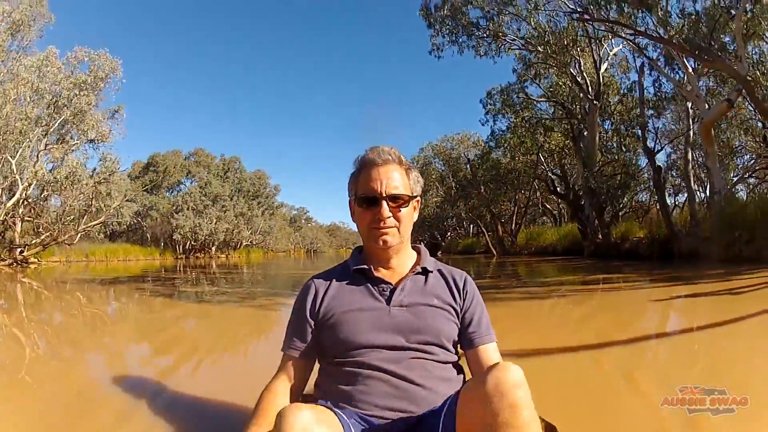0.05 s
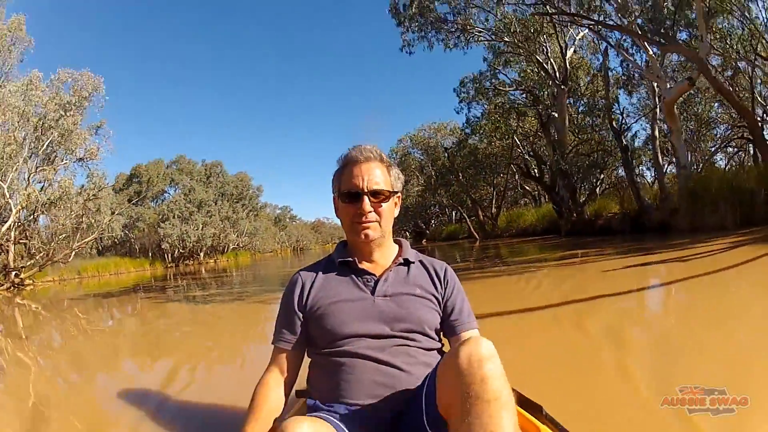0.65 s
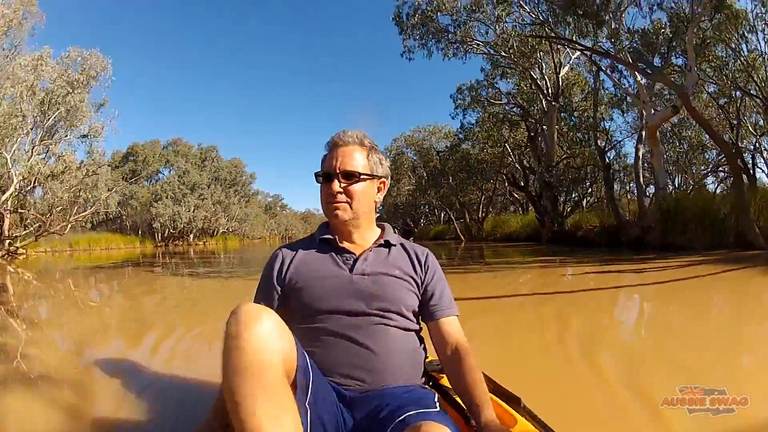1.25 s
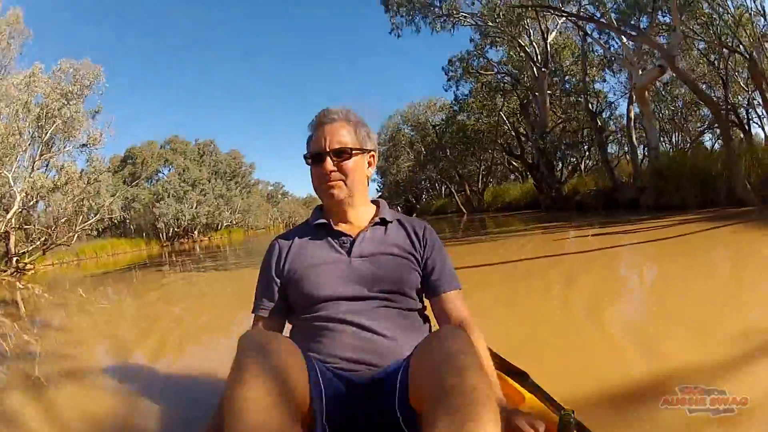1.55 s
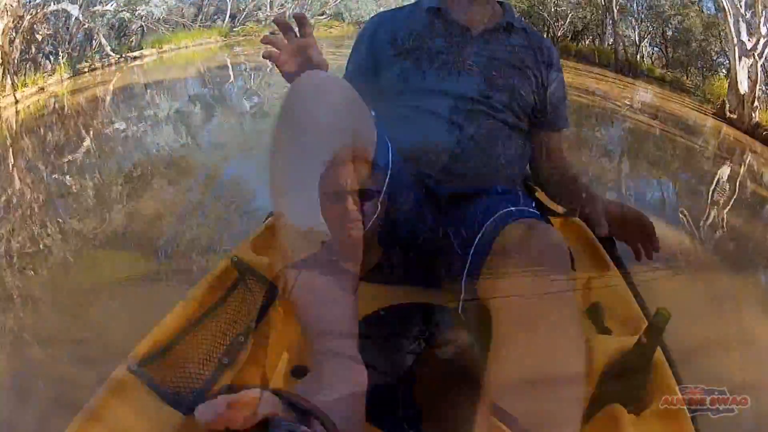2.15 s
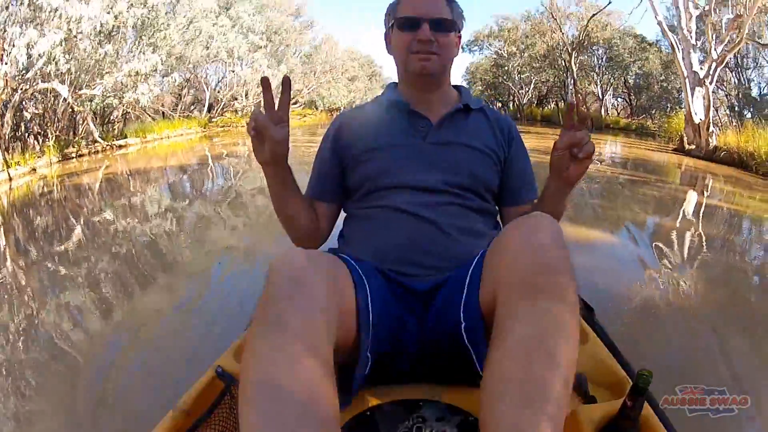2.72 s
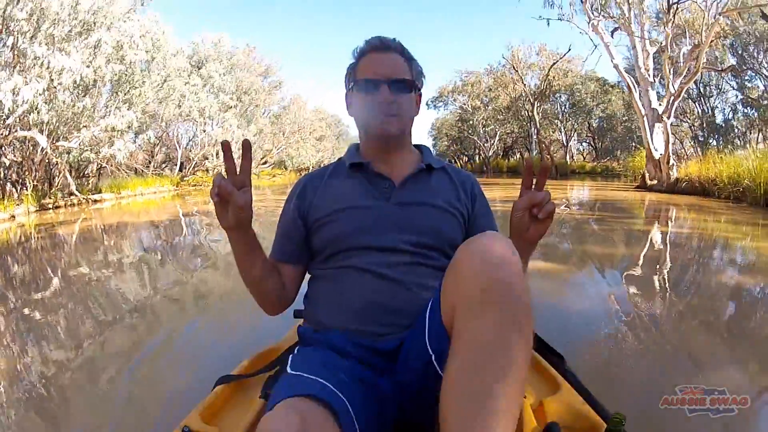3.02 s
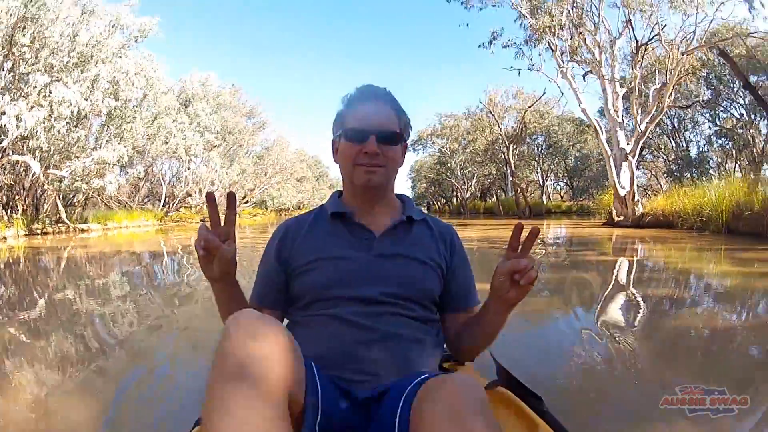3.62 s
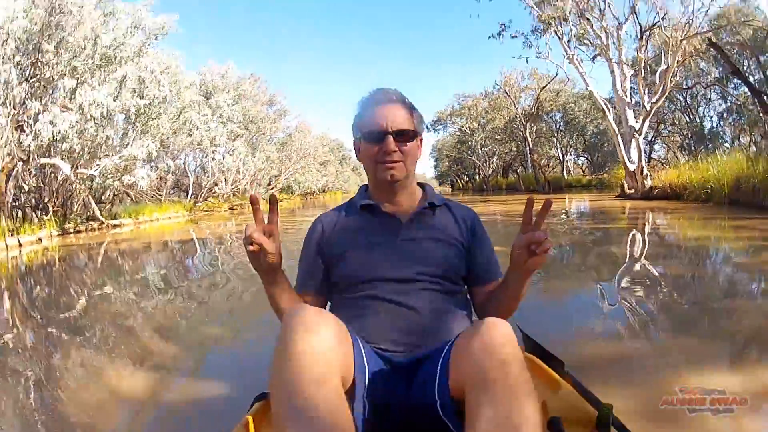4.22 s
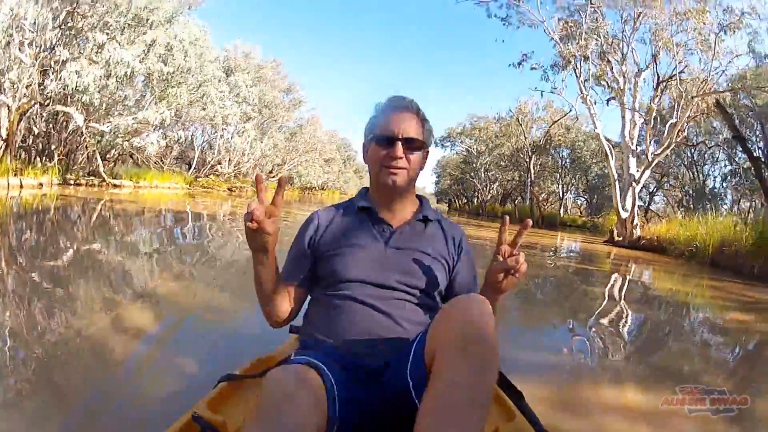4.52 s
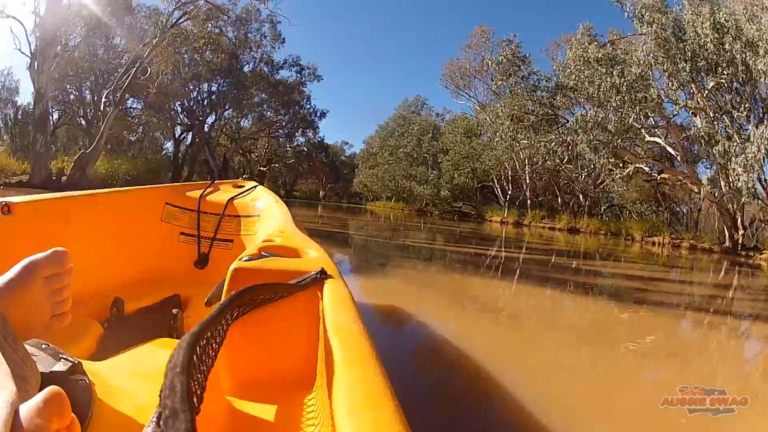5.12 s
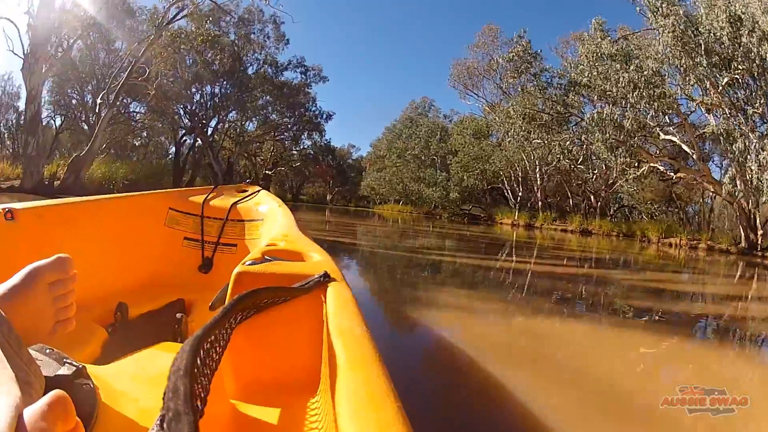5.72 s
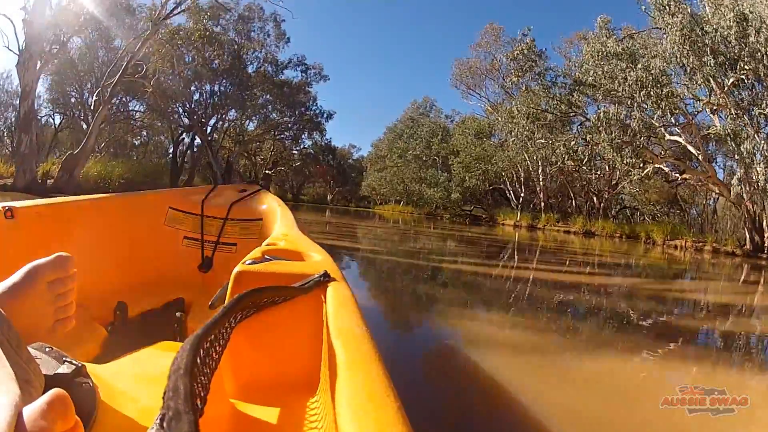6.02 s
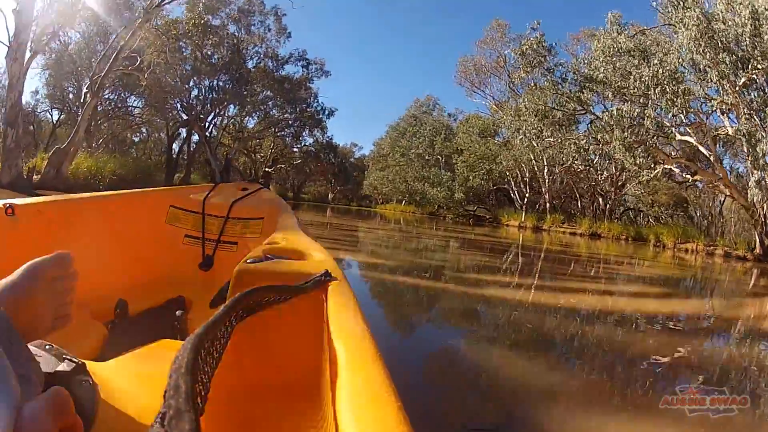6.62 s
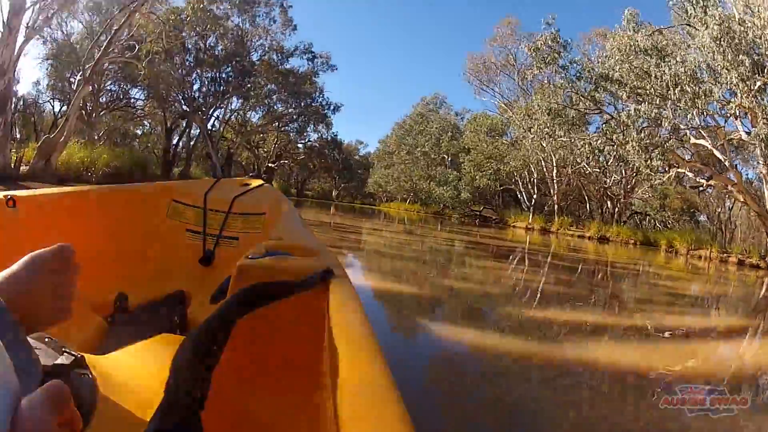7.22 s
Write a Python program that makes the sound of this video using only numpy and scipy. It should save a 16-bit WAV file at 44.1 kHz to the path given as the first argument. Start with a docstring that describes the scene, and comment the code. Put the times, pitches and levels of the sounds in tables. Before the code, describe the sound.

A camera sealed in a waterproof case rides a plastic kayak on still water. A dull hush and low rumble come first, then faint rubbing, scuffs and knocks on the case, the sharpest near the end of the handling. From about five seconds the kayak glides: the hollow hull booms softly while water trickles, bubbles plop and droplets tick. Everything sounds boxed in, with a gritty treble.

```python
"""A camera in a sealed waterproof case rides on a plastic kayak on a still waterhole.
First there is a dull hush and the rumble of the rocking mount. From 1 s a hand rubs the case, which
is scuffed and knocked, and a jolt sets the mount swaying. From about 5 s the kayak glides: the hollow
hull booms softly, water trickles along the side, bubbles plop and chirp, and droplets smack down.
Throughout, the camera samples at a low rate and holds each sample, which adds a gritty treble."""
import sys
import numpy as np
from scipy import signal
from scipy.fft import rfft, irfft, next_fast_len
from scipy.io import wavfile
from scipy.ndimage import uniform_filter1d, map_coordinates

SR = 44100
rng = np.random.default_rng(int(sys.argv[2]) if len(sys.argv) > 2 else 0)


def to_wav(sig):
    """Store sig (one row per channel, or 1-D mono) as 16-bit WAV at the path in sys.argv[1].

    Samples outside -1..1 are clipped; the rate is SR.
    """
    pcm = np.clip(np.atleast_2d(sig), -1, 1) * 32767
    pcm = np.round(pcm).astype(np.int16)
    wavfile.write(sys.argv[1], SR, pcm.T)  # frames by channels


N = 328986
TIME = np.arange(N) / SR
GLIDE_S, GLIDE_FADE_S = 4.935, 0.055  # when the glide starts, and how long it takes to fade in

# the tone of rubbing on the case: (frequency [Hz], level [dB])
RUB_SPECTRUM = [(100, 3.5), (400, -5.5), (520, -6), (880, -2), (1120, -15), (1300, -15), (1480, -14),
                (1750, -8.5), (2020, -2.5), (2420, -18), (2620, -7.5), (2830, -14), (3100, -6.5),
                (3600, -29), (3900, -17)]
# the tone of moving water: (frequency [Hz], level [dB])
WATER_SPECTRUM = [(150, -12.5), (400, -14.5), (530, -0.5), (660, -8.5), (860, 3.5), (1160, -9.5),
                  (1290, -1.5), (1650, -10), (2060, -1.5), (2330, -26.5), (2480, -42), (2610, -7.5),
                  (2750, -20.5), (3550, -17.5), (3800, -35)]


def amp(db):
    """Turn decibels into a gain to multiply by."""
    return 10 ** (np.asarray(db) / 20)


def unit(x):
    """Scale a sound to an average (rms) size of 1."""
    return x / np.sqrt(np.mean(x ** 2) + 1e-20)


def filtered(x, response):
    """Turn each frequency in x up or down by the gain response(hz)."""
    size = next_fast_len(len(x) + SR // 4)
    return irfft(rfft(x, size) * response(np.fft.rfftfreq(size, 1 / SR)), size)[:len(x)]


def coloured(x, spectrum):
    """Give x the tone of a spectrum table, at rms 1."""
    points_hz, db = np.transpose(spectrum)
    return unit(filtered(x, lambda hz: amp(np.interp(np.log(hz + 1), np.log(points_hz), db))))


def hump(hz, centre_hz, octaves):
    """A gain of 1 at centre_hz that falls away on both sides."""
    return np.exp(-(np.log2((hz + 1) / centre_hz) / octaves) ** 2 / 2)


def band(x, centre_hz, octaves):
    """Keep the part of x near centre_hz, at rms 1."""
    return unit(filtered(x, lambda hz: hump(hz, centre_hz, octaves)))


def wobble(rate):
    """A smooth curve through rate random values a second."""
    return map_coordinates(rng.standard_normal(int(N * rate / SR) + 4), [TIME * rate])


def fade(t, t60):
    """Die away by 60 dB every t60 seconds."""
    return np.exp(-np.log(1000) * t / t60)


def swell(t, peak_at):
    """A soft rise to 1 and a slower fall."""
    return (t / peak_at * np.exp(1 - t / peak_at)) ** 2


def bell(t, middle, half):
    """A smooth rise to 1 and a matching fall."""
    return np.exp(-((t - middle) / half) ** 2 / 2)


def add(track, s, sound):
    """Mix a sound into the track from s seconds on."""
    part = track[max(round(s * SR), 0):][:len(sound)]
    part += sound[:len(part)]


def still_air(hush_db=-58, rumble_hz=44):
    """The dull, steady hush inside the case, over the deep rumble of the rocking mount."""
    # the tone of the hush: (frequency [Hz], level [dB])
    hush_spectrum = [(20, -13.5), (120, -10.5), (200, -9.5), (320, -15), (480, -21), (1400, -27),
                     (3600, -32), (3900, -39)]
    # how loud the mount rumbles: (time [s], level [dB])
    rumble_levels = [(0, -59), (1.8, -62), (2.1, -59), (4.85, -52), (5.2, -51), (7.46, -52)]
    hush = amp(hush_db) * coloured(rng.standard_normal(N), hush_spectrum)
    rumble = band(rng.standard_normal(N), rumble_hz, octaves=1)
    return hush + amp(np.interp(TIME, *np.transpose(rumble_levels))) * rumble


def grip(start_s=1.0, end_s=4.55, midway_db=-65.5, firming_db_per_s=2.6, uneven_db=2.5):
    """The hand shifts on the case in faint, uneven rubs, a little firmer as time goes on."""
    held = uniform_filter1d(1.0 * (TIME > start_s) * (TIME < end_s), size=SR // 10)
    db = midway_db + firming_db_per_s * (TIME - (start_s + end_s) / 2) + uneven_db * wobble(rate=14)
    return held * amp(db) * coloured(rng.standard_normal(N), RUB_SPECTRUM)


def scuffs(grain_db=3, boost_db=9, squeak_hz=3470):
    """Short strokes of friction on the case make a grainy rub with a thin squeak."""
    # (peak time [s], half length [s], rub level [dB], boosted frequency [Hz], squeak against rub [dB])
    strokes = [(1.255, 0.03, -56.5, 1850, -29), (1.559, 0.012, -57, 1700, -12),
               (1.971, 0.0093, -49, 3040, -4.5), (2.284, 0.0075, -37.5, 830, -38),
               (2.311, 0.014, -39.5, 1020, -25), (2.358, 0.015, -54.5, 1500, -14),
               (2.574, 0.019, -60, 1700, -12), (3.012, 0.02, -57.5, 1350, -16),
               (3.482, 0.0086, -52.5, 850, -20), (3.52, 0.045, -59.5, 1180, -7),
               (3.6, 0.013, -51, 1090, -11.5), (3.648, 0.02, -54.5, 1090, -10.5),
               (4.419, 0.0074, -50, 1300, -11)]
    out, t = np.zeros(N), np.arange(SR // 3) / SR
    middle = t.mean()
    for s, half, db, centre_hz, squeak_db in strokes:
        roughness = np.interp(t, np.linspace(0, t[-1], 130), rng.standard_normal(130))
        grains = rng.standard_normal(len(t)) * amp(grain_db * roughness)
        rub = coloured(grains, RUB_SPECTRUM)
        rub = unit(filtered(rub, lambda hz: amp(boost_db * hump(hz, centre_hz, octaves=0.52))))
        squeak = amp(squeak_db) * band(grains, squeak_hz, octaves=0.035)
        add(out, s - middle, amp(db) * bell(t, middle, half) * (rub + squeak))
    return out


def knocks(thud_hz=125, rattle_db=-12.5, vary_db=2.14, softness=2.9):
    """Each knock rings the case and thuds the mount; soft knocks ring only the low tones."""
    # knocks on the case: (time [s], ring peak [dB], brightness [Hz], thud against ring [dB])
    hits = [(1.96, -40, 4500, -20), (1.977, -32.5, 900, -28), (2.011, -45, 450, -18),
            (2.69, -42.5, 640, -4), (2.789, -33.5, 390, -2), (3.204, -45, 800, -9),
            (3.260, -40.5, 480, -12), (3.296, -43.5, 650, -21), (3.586, -42.5, 4100, 0),
            (3.846, -39, 1200, -2.5), (3.988, -35, 1140, -14), (4.2123, -14.5, 5330, -21.5),
            (4.275, -24, 2630, -12), (4.601, -22.5, 6000, -14), (4.714, -24, 4850, -9.5)]
    # the tones the case rings with: (pitch [Hz], level [dB], time to fade by 60 dB [s])
    case_tones = [(322.8, -15.5, 0.13), (403.6, -12.5, 0.21), (631, -15.5, 0.11), (812, -5, 0.045),
                  (901, -4.5, 0.059), (1027, -8.5, 0.037), (1295, -5.5, 0.069), (1660, -10, 0.024),
                  (2012, -1.5, 0.041), (2720, -15, 0.044), (3273, -13, 0.043), (3555, -19, 0.048)]
    out, t = np.zeros(N), np.arange(SR // 3) / SR
    hz, db, t60 = np.transpose(case_tones)[:, :, None]
    # neighbouring tones start in opposite directions, so the ring takes a moment to build
    directions = (-1) ** np.arange(len(case_tones))[:, None]
    tones = directions * amp(db) * np.sin(2 * np.pi * hz * t) * fade(t, t60)
    for s, peak_db, bright_hz, thud_db in hits:
        ring = amp(vary_db * rng.standard_normal(len(case_tones))) @ tones
        ring += amp(rattle_db) * coloured(rng.standard_normal(len(t)), RUB_SPECTRUM) * fade(t, 0.12)
        ring = filtered(ring, lambda f: 1 / (1 + 1j * f / bright_hz) ** softness)  # dull the treble
        pitch = thud_hz * np.exp(rng.normal(0, 0.1))
        thud = np.sin(2 * np.pi * pitch * t) * fade(t, 0.1) * (1 - fade(t, 0.013))
        add(out, s, amp(peak_db) * (ring / np.abs(ring).max() + amp(thud_db) * thud))
    return out


def sway(start_s=2.265, peak_db=-28, hz=42):
    """One jolt sets the mount swaying with a short, deep tone."""
    out, t = np.zeros(N), np.arange(SR // 3) / SR
    add(out, start_s, amp(peak_db) * np.sin(2 * np.pi * hz * t) * swell(t, peak_at=0.012))
    return out


def gliding():
    """Rise from 0 before the glide to 1 during it."""
    return np.clip((TIME - GLIDE_S) / GLIDE_FADE_S, 0, 1)


def hull(boom_db=-45.5, evenness=0.51):
    """The hollow hull booms near its lowest note, and swells as each ripple presses on it."""
    # the tone of the hull: (frequency [Hz], level [dB])
    hull_spectrum = [(20, -11.5), (45, -9), (62, -4), (75, 2.5), (92, -1), (115, -16.5), (160, -18),
                     (230, -25), (400, -47.5), (800, -88)]
    # ripples against the hull: (peak time [s], half length [s], level [dB])
    ripples = [(4.967, 0.012, -37), (5.402, 0.079, -34.5), (6.205, 0.031, -30), (6.33, 0.049, -35.5),
               (6.608, 0.083, -37.5), (7.02, 0.067, -37.5), (7.428, 0.02, -35.5)]
    boom = coloured(rng.standard_normal(N), hull_spectrum)
    strength = np.abs(uniform_filter1d(boom ** 2, SR // 16)) + 1e-6
    even_boom = unit(boom / strength ** (evenness / 2))  # tame the noise's own random swells
    ripple_power = sum((amp(db) * bell(TIME, s, half)) ** 2 for s, half, db in ripples)
    return np.sqrt((amp(boom_db) * gliding()) ** 2 + ripple_power) * even_boom


def bubble(t, hz, rise_s, bend):
    """A bubble rings with a soft start; its pitch slides up, or down if bend is negative."""
    pitch = hz * (1 + bend * np.tanh(t / rise_s - 1))
    return swell(t, rise_s) * np.sin(2 * np.pi * np.cumsum(pitch) / SR)


def trickle(bubbles_per_s=400, base_db=-53.5, easing_db_per_s=0.92, gush_db=4):
    """Tiny bubbles and rustling water slide past the hull in gushes, easing as the kayak slows."""
    crowd, t = np.zeros(N), np.arange(SR // 80) / SR
    for when, highness, faintness in rng.random((int(bubbles_per_s * N / SR), 3)):
        db = -5 * np.log(faintness + 0.027)  # many quiet bubbles, a few loud ones
        add(crowd, when * N / SR, amp(db) * bubble(t, 900 + 2700 * highness, rise_s=0.0015, bend=0.022))
    bubbles = amp(-4.5) * coloured(crowd, WATER_SPECTRUM)
    rustle = amp(-4) * coloured(rng.standard_normal(N), WATER_SPECTRUM)
    flow_db = base_db - easing_db_per_s * (TIME - GLIDE_S) + gush_db * wobble(rate=50)
    return gliding() * amp(flow_db) * (bubbles + rustle)


def chirps(roughness=0.11):
    """A few bubbles chirp, sliding unsteadily in pitch."""
    # (time [s], length [s], first pitch [Hz], last pitch [Hz], peak level [dB])
    sliding_bubbles = [(4.99, 0.022, 3880, 2650, -50), (5.184, 0.075, 2330, 3450, -48),
                       (6.172, 0.02, 1354, 2220, -41.5)]
    out = np.zeros(N)
    for s, length, first_hz, last_hz, db in sliding_bubbles:
        pitch = np.geomspace(first_hz, last_hz, int(length * SR))
        pitch *= 1 + roughness * unit(uniform_filter1d(rng.standard_normal(len(pitch)), size=30))
        add(out, s, amp(db) * np.hanning(len(pitch)) * np.sin(2 * np.pi * np.cumsum(pitch) / SR))
    return out


def small_plops(per_s=12, db=-45, spread_db=1.5, middle_hz=1536, octaves=0.414):
    """List quieter plops, loosely spaced along the glide: (time [s], base level [dB], pitch [Hz])."""
    slots = np.arange(GLIDE_S + GLIDE_FADE_S, N / SR, 1 / per_s)
    late, faintness, highness = rng.standard_normal((len(slots), 3)).T
    times = slots + np.abs(late) / per_s
    return zip(times, db - spread_db * faintness, middle_hz * 2 ** (octaves * highness))


def plops(rise_cycles=5.7, bend=0.015, spray_count=5):
    """Each plop is one main bubble, a spray of small ones breaking off just after, and a splash."""
    # the loudest plops beside the hull: (time [s], base level [dB], pitch [Hz])
    loud_plops = [(5.025, -38.5, 883), (5.121, -37, 856), (5.139, -39, 1820), (5.35, -40, 1330),
                  (5.426, -36.5, 1530), (5.482, -32, 1460), (5.624, -34.5, 1677), (5.688, -41, 1350),
                  (5.714, -38, 1980), (5.758, -35, 1280), (5.944, -38, 1880), (6.028, -41, 1420),
                  (6.047, -33, 1270), (6.281, -32, 1950), (6.319, -40, 930), (6.407, -38.5, 1920),
                  (6.434, -32.5, 1297), (6.494, -35, 1520), (6.621, -38.5, 1187), (6.985, -37.5, 904),
                  (7.104, -36, 1460), (7.402, -31.5, 1710)]
    out, splash, t = np.zeros(N), np.zeros(N), np.arange(SR // 12) / SR
    for s, db, hz in [*loud_plops, *small_plops()]:
        rise_s = rise_cycles / hz  # low bubbles last longer
        add(out, s, amp(db - 5) * bubble(t, hz, rise_s, bend * rng.normal()))
        for delay, highness, slide in rng.standard_normal((spray_count, 3)):
            spray = bubble(t, hz * np.exp(0.18 * highness), rise_s=0.0018, bend=bend * slide)
            add(out, s + 0.008 * abs(delay), amp(db - 12) * spray)
        add(splash, s, amp(db - 18) * fade(t, 0.16) * (1 - fade(t, 0.0026)))
    return out + splash * coloured(rng.standard_normal(N), WATER_SPECTRUM)


def smacks(centre_hz=2900):
    """Droplets hit the surface with short, bright ticks."""
    # (time [s], level [dB])
    droplets = [(5.425, -46.5), (5.832, -53), (6.278, -42.5), (6.341, -44), (6.935, -54.5), (7.212, -54)]
    bursts, t = np.zeros(N), np.arange(SR // 10) / SR
    for s, db in droplets:
        add(bursts, s, amp(db) * fade(t, t60=0.046))
    return bursts * band(rng.standard_normal(N), centre_hz, octaves=0.46)


def scene():
    """One microphone hears everything; both channels carry it."""
    case = still_air() + grip() + scuffs() + knocks() + sway()
    kayak = hull() + trickle() + chirps() + plops() + smacks()
    return np.array([case + kayak] * 2)


def record(dry, cutoff_hz=3760, camera_hz=8000, top_hz=15800, treble_db=2, hiss_db=-77):
    """The camera cuts the highs, then holds each slow sample; the steps mirror sound into the treble."""
    narrow = filtered(dry.mean(axis=0), lambda hz: 1 / np.sqrt(1 + (hz / cutoff_hz) ** 50))
    samples = signal.resample_poly(narrow, camera_hz, SR, window=('kaiser', 3))
    steps = signal.resample_poly(np.repeat(samples, 6), SR, 6 * camera_hz)[:N]
    channels = []
    for noise in rng.standard_normal((2, N)):  # each channel has a faint hiss of its own
        hissy = steps + amp(hiss_db) * band(noise, centre_hz=2500, octaves=0.76)
        # lift the treble a little, and keep nothing above top_hz
        channels.append(filtered(hissy, lambda hz: amp(treble_db * (hz / top_hz) ** 2) * (hz < top_hz)))
    return np.array(channels)


dry = scene()
out = record(dry)
to_wav(out)
```